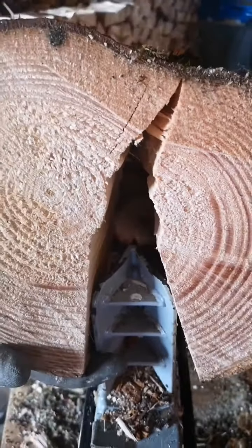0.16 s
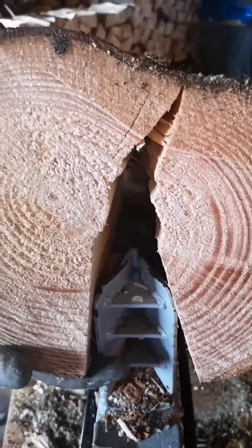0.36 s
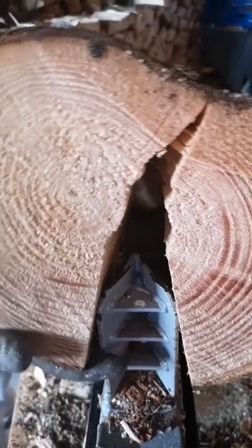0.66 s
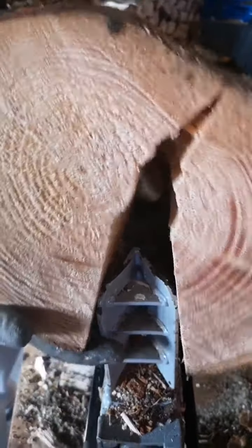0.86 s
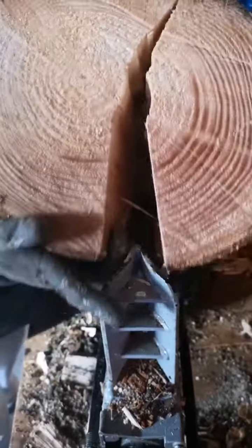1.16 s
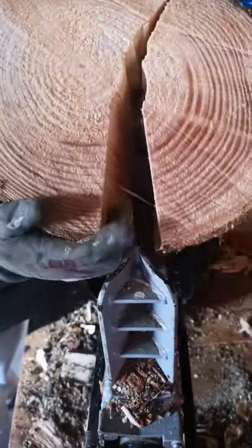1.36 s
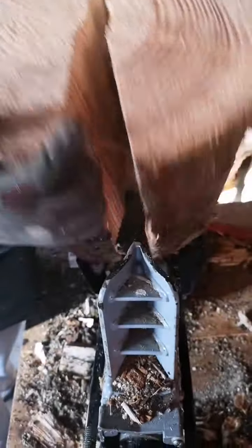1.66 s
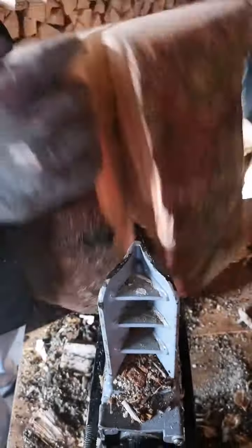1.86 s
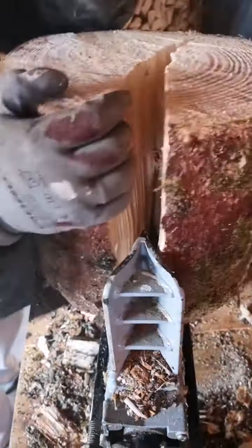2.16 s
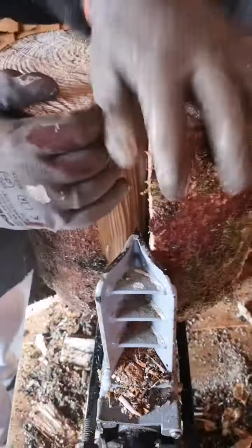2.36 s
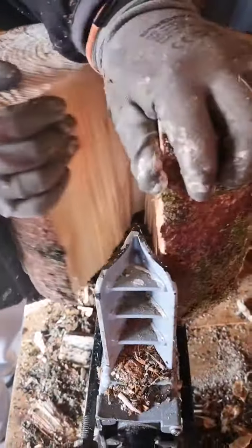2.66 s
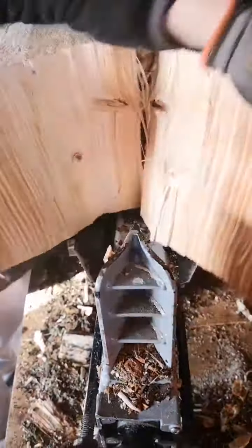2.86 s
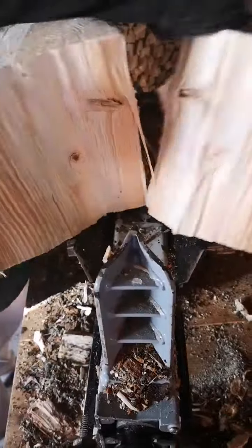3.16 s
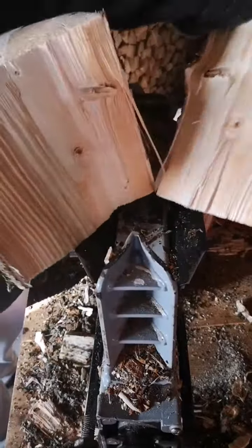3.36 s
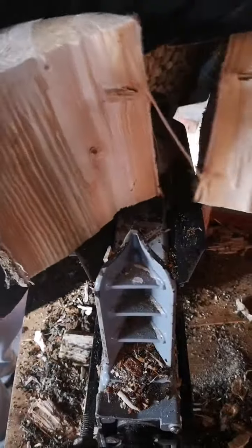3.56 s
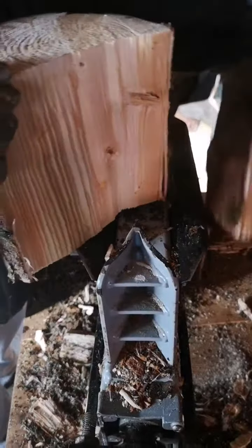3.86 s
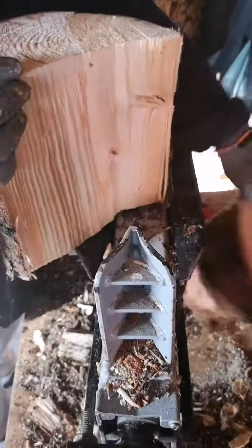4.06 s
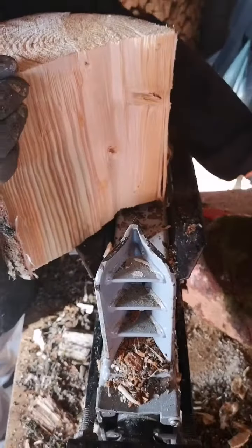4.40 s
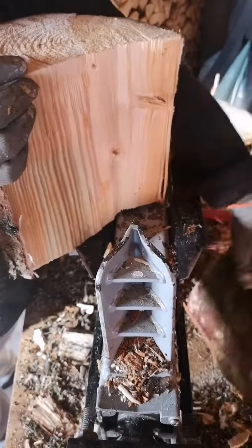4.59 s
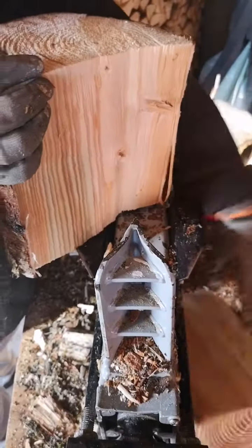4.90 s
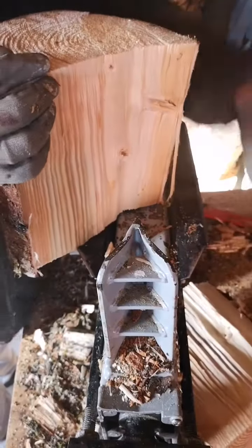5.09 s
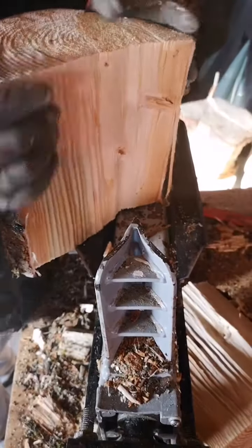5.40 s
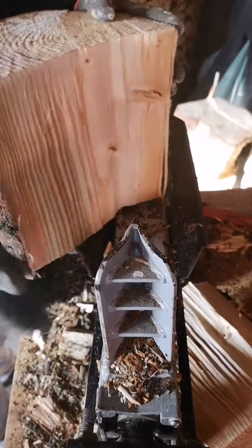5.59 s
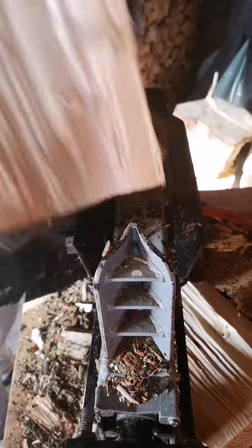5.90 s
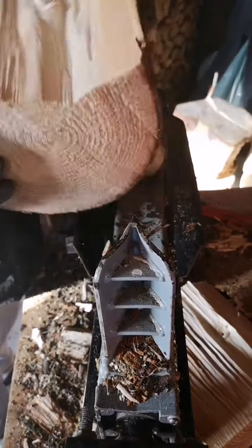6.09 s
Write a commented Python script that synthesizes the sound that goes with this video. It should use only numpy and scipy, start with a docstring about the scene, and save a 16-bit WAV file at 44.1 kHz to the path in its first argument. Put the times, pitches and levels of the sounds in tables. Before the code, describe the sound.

A half-split log bumps softly against a log splitter's steel wedge, with a knock and a small ping. It tips onto the steel bed with heavy thuds and a short metallic hum, then is pulled in two with sharp cracks and snapping fibres. One half drops and tumbles to rest. Gloves and bark rub faintly, all close by in quiet outdoor air.

```python
"""First comes a soft bump, then a knock and a ping: a half-split log hits a log splitter's steel wedge.
Gloved hands work it loose, close by in a wood yard. It tips onto the steel bed, which hums on,
and is pulled in two with sharp cracks and countless small snapping fibres. One half is dropped
and tumbles to rest with heavy thuds. Gloves and bark rub and wood squeaks faintly on steel.
Under it all lie quiet outdoor air and a faint low hum, like the steel bed still ringing."""
import sys
import numpy as np
from scipy import signal
from scipy.fft import rfft, irfft
from scipy.io import wavfile

SR = 44100
rng = np.random.default_rng(int(sys.argv[2]) if len(sys.argv) > 2 else 0)


def unload_wav(signal):
    """Save mono or channel-first audio to the path in sys.argv[1] as 16-bit WAV at rate SR, clipped to [-1, 1]."""
    wavfile.write(
        sys.argv[1],
        SR,
        np.round(np.clip(np.atleast_2d(signal).T, -1, 1) * 32767).astype(np.int16),
    )


N = 275184
TIME = np.arange(N) / SR

# The log landing: start_s, level_db, pitch_hz, overtone_db (added to level_db)
LANDINGS = [(0.088, -46.5, 70, -12.5), (0.47, -45, 111, 14), (0.501, -38.5, 66, 11),
            (1.125, -21.5, 65.3, -17), (1.199, -34.5, 96.3, 4), (1.993, -6.5, 67, -20),
            (2.036, -12.5, 68.4, 3.5), (2.074, -6.5, 76, -8), (2.142, -18.5, 84.6, 2.5),
            (2.337, -30, 66.6, 1), (2.986, -31, 69.3, -6.5), (3.349, -32, 60, -26), (4.105, -13, 66.2, 9.5),
            (4.203, -8, 83.17, -7), (4.678, -10, 67.9, 1), (4.742, -12.5, 76.3, -10.5),
            (4.88, -15, 81, -24.5), (4.92, -24, 76.6, 13), (4.944, -3, 75.2, -6.5), (5.056, -4.5, 73, -2),
            (5.113, -8, 90.2, -18)]

def thuds(low_t60_s=0.17, overtone_t60_s=0.21, overtone_ratio=1.98):
    """The heavy log bounces: a low tone and its overtone. A t60 is the time taken to fade by 60 dB."""
    low = fading_tones([(s, db, hz, low_t60_s) for s, db, hz, _ in LANDINGS])
    high = fading_tones([(s, db + overtone_db, hz * overtone_ratio, overtone_t60_s)
                         for s, db, hz, overtone_db in LANDINGS])
    soft_contact = signal.butter(2, [33, 320], "band", fs=SR, output="sos")
    near = place(signal.sosfilt(soft_contact, low + high), lag_ms=.15, pan_db=-.1)
    return with_echo(near, echo_db=-12)


# Wood hitting steel or wood: start_s, low_db, mid_db, high_db, rattle_db (added to those), pitch_hz
WOOD_HITS = [(0.468, -35.5, -29, -78.5, -22, 630), (1.06, -38.5, -52, -49.5, -2.5, 1420),
             (1.158, -49, -57, -59, -1, 300), (1.198, -44, -54.5, -60, -2.5, 2000),
             (1.301, -58.5, -55.5, -51, 1.5, 330), (1.309, -38.5, -47, -45.5, -7.5, 2100),
             (1.602, -72, -60, -76, -18, 1220), (1.979, -35.5, -47, -52.5, 8, 685),
             (2.02, -28, -30, -28.5, -3, 248), (2.07, -25.5, -39, -35.5, -4, 910),
             (2.116, -39, -34, -32, -7, 826), (2.145, -18.5, -29, -47, -10, 504),
             (2.678, -48, -47, -57.5, -4.5, 258.8), (3.209, -52, -58, -68, -11.5, 285),
             (3.298, -52, -60, -76, -9.5, 282), (3.645, -46.5, -47, -68.5, -13.5, 303),
             (3.74, -62, -85.5, -84, -7, 278.2), (3.937, -54, -46.5, -41.5, -18, 1883),
             (3.995, -49.5, -60.5, -80, -6.5, 267), (4.088, -34, -45, -51, -1, 290),
             (4.108, -25, -35, -38.5, -6, 264), (4.124, -17, -29, -36, -4.5, 1390),
             (4.208, -40.5, -40, -59.5, -8.5, 800), (4.683, -22, -35, -65.5, -10.5, 1500),
             (4.87, -51.5, -64.5, -75, -2, 326), (4.92, -34, -41, -43, -11.5, 269.5),
             (5.062, -27, -42, -49.5, -12, 737), (5.11, -47, -50, -77, -18, 1000),
             (5.423, -96.5, -70.5, -70.5, -4.5, 2220), (5.819, -61, -70, -52, -16, 2102)]
# The tone colour all knocks share: frequency_hz, level_db
KNOCK_SPECTRUM = [(40, -23), (110, -6.5), (260, 0), (480, -11), (850, 1), (1300, -7.5), (1900, 3.5),
                  (3000, -4), (6000, -4), (9400, -7.5), (13000, -28.5)]
# How long rattles and echoes last: frequency_hz, t60_s
FADE_TIMES = [(60, 0.46), (300, 0.38), (1000, 0.37), (3000, 0.42), (8000, .33), (15000, 0.1)]

def knocks(click_db=4, crush_db=2, tail_db=3, hollow_db=7, hollow_octaves=.45, top_hz=10800):
    """Each knock is a click, a brief crushing of bark and a rattle, boosted at the pitch of the wood."""
    start_s, low_db, mid_db, high_db, rattle_db, pitch_hz = np.transpose(WOOD_HITS)
    crush_noise = rng.standard_normal((2, N))
    rattle_noise = [stereo_noise(), stereo_noise()]
    near, rattles = 0, 0
    for k, (hz, band) in enumerate(bands()):
        level_db = np.array([at_hz([(300, low), (1000, mid), (6000, high)], hz)
                             for low, mid, high in zip(low_db, mid_db, high_db)])
        boost_db = hollow_db * np.exp(-(np.log2(hz / pitch_hz) / hollow_octaves) ** 2)
        size = from_db(at_hz(KNOCK_SPECTRUM, hz) + level_db + boost_db)
        click = signal.sosfilt(band, clicks(start_s, size)) * SR / hz * (-1) ** k
        crush_fade = fades(start_s, size, t60_s=0.099, rise_s=0.001)
        crush = rms_one(signal.sosfilt(band, crush_noise[k % 2])) * crush_fade
        near += from_db(click_db) * click + from_db(crush_db) * crush
        rattle_size = size * from_db(rattle_db + tail_db)
        rattle_fade = fades(start_s, rattle_size, at_hz(FADE_TIMES, hz), rise_s=0.0019)
        rattles += rms_one(signal.sosfilt(band, rattle_noise[k % 2])) * rattle_fade
    sound = place(near, lag_ms=.66, pan_db=-3) + pan(rattles, -2)
    return signal.sosfilt(signal.butter(2, top_hz, fs=SR, output="sos"), sound)


# Bare wood meeting something hard: start_s, level_db, pitch_hz, t60_s
HARD_HITS = [(0.468, -13.5, 700, 0.017), (1.058, -35.5, 1520, 0.018), (1.310, -36, 2230, .012),
             (2.1452, -8, 670, 0.0086), (2.1462, -11.5, 1781, 0.009), (4.128, -21.5, 1673, 0.014),
             (4.6845, -15, 882, 0.012), (5.063, -24, 802, .025)]

def clacks():
    """A hard hit makes the wood ring for an instant."""
    near = place(fading_tones(HARD_HITS), lag_ms=.7, pan_db=-7)
    return with_echo(near, echo_db=-9)


# Strands snapping, chips cracking and the sharp tick of a knock: start_s, snap_db, log_ring_db
SHARP_CRACKS = [(1.851, -51, -49.5), (2.3115, -38, -29.5), (2.78, -35, -20), (2.789, -19, -9),
                (2.8123, -12, -1.5), (2.833, -16.5, -13.5), (2.8444, -20, -11), (2.872, -23, -34.5),
                (2.880, -21, -38), (2.917, -25, -22), (2.922, -30, -35), (3.068, -23.5, -36.5),
                (3.104, -29.5, -37), (3.1807, -25, -32), (3.194, -20.5, -31), (3.205, -22.5, -59),
                (3.2584, -34, -53), (3.281, -24, -34), (3.305, -23.5, -39), (3.310, -22.5, -36),
                (3.5271, -32.5, -45), (3.548, -32.5, -31.5), (3.899, -41, -43.5), (3.938, -25, -35),
                (4.1225, -19.5, -18)]
# The bright sound of breaking fibres: frequency_hz, level_db
FIBRE_SPECTRUM = [(400, -29.5), (1000, -10.5), (2000, -4.5), (4000, -7.5), (8500, 3), (10000, -4.5),
                  (12500, -14), (15000, -16)]
# The tones the splitting log rings at: pitch_hz, width_hz, level_db
LOG_TONES = [(340, 150, -15), (1220, 220, -12), (1680, 330, -3), (1990, 360, -1), (3000, 600, -11),
             (4100, 700, -10), (5400, 700, -20)]

def cracks(snap_boost_db=3.5, log_boost_db=16, stereo_db=7):
    """Each sharp crack is a burst of a few milliseconds that rings the log."""
    start_s, snap_db, log_ring_db = np.transpose(SHARP_CRACKS)
    noise = rng.standard_normal(N) + from_db(stereo_db) * stereo_noise()
    burst_fade = fades(start_s, from_db(snap_db + snap_boost_db), t60_s=0.008, rise_s=0.0014)
    burst = colour(noise, FIBRE_SPECTRUM) * burst_fade
    push_fade = fades(start_s, from_db(log_ring_db + log_boost_db), t60_s=0.02, rise_s=0.00018)
    push = rng.choice([-1, 1], N) * push_fade
    log = sum(from_db(db) * resonate(push, hz, width_hz) * (-1) ** k
              for k, (hz, width_hz, db) in enumerate(LOG_TONES))
    near = pan(burst, 4) + place(log, lag_ms=-.15, pan_db=-2)
    return with_echo(near, echo_db=-13)


# Three tugs pulling the halves apart: start_s, strongest_s, end_s, fibre_db, splinter_db
TUGS = [(2.8, 2.87, 2.997, -39.5, -38), (3.12, 3.22, 3.37, -41.5, -46.5), (3.5, 3.54, 3.618, -54.5, -55.5)]
# The duller sound of coarse splinters: frequency_hz, level_db
SPLINTER_SPECTRUM = [(150, 11.5), (500, -10.5), (1200, 4), (1900, 2), (3000, 5), (5000, -13), (10000, -36)]

def tearing(fibre_boost_db=2):
    """Countless fibres break in clumps as the halves part."""
    fine_gain, coarse_gain = stroke_gains(TUGS, swell_db=12.5, fade_s=0.021) * jerks(depth_db=6)
    fibres = colour(grains(per_s=2500, spread_db=4.5), FIBRE_SPECTRUM)
    splinters = colour(grains(per_s=1200, spread_db=4), SPLINTER_SPECTRUM)
    near = from_db(fibre_boost_db) * fine_gain * fibres + coarse_gain * splinters
    return pan(with_echo(near, echo_db=-7), -0.5)


# Blows on the wedge: start_s, level_db, centre_hz (tones near it ring most)
WEDGE_HITS = [(0.474, -36.5, 2500), (1.061, -46.5, 3000), (1.198, -36.5, 4560), (2.024, -25, 8520),
              (2.072, -28.5, 7500), (2.12, -29, 2820), (2.12, -27.5, 6400)]
# The wedge's own tones: pitch_hz, level_db, t60_s
WEDGE_TONES = [(2757, 7, 0.13), (2840, -17.5, .1), (4400, -18.5, .28), (4840, -13, 0.43),
               (6020, -0.5, 0.059), (7640, -0.5, 0.052), (7780, -3.5, 0.081), (9090, 1.5, 0.083)]

def wedge_pings(drop_db_per_octave=20):
    """The steel wedge pings; where it is touched decides which tones answer."""
    start_s, level_db, centre_hz = np.transpose(WEDGE_HITS)
    pings = 0
    for hz, db, t60_s in WEDGE_TONES:
        drop_db = drop_db_per_octave * abs(np.log2(hz / centre_hz))
        pings += ring(clicks(start_s, from_db(level_db + db - drop_db)), hz, t60_s)
    return place(pings, lag_ms=0.0055, pan_db=0.9)


# Blows that reach the steel bed: start_s, level_db, brightness_db_per_octave
BED_HITS = [(0.472, -38.5, -2.2), (1.059, -36.5, -1), (2.119, -15, -3.5), (4.124, -27, 3.5)]
# The bed's own tones: pitch_hz, level_db, t60_s
BED_TONES = [(185, -14.5, 1.33), (300, -16, 0.62), (426, -30, 1.0), (658, -26.5, 0.7), (803, -17, .28),
             (932, -19, .18), (1210, -38, 2.1), (1560, -30.5, 0.37), (1760, -25, 0.96), (2190, -32, .55),
             (3405, -19.5, .55), (4770, -22, 0.37)]

def bed_hum(pivot_hz=494, twin_gap_hz=8, twin_db=-9):
    """The steel bed hums on after a blow; each tone wavers against a slightly higher twin."""
    start_s, level_db, brightness = np.transpose(BED_HITS)
    hum = 0
    for hz, db, t60_s in BED_TONES:
        push = clicks(start_s, from_db(level_db + db + brightness * np.log2(hz / pivot_hz)))
        twin_hz = hz + twin_gap_hz * rng.uniform(.5, 1.8)
        hum += ring(push, hz, t60_s) + from_db(twin_db) * ring(push, twin_hz, t60_s)
    return place(hum, lag_ms=0.17, pan_db=-0.5)


# Gloves, sleeves and bark sliding: start_s, strongest_s, end_s, hiss_db, rasp_db
SLIDES = [(0.315, 0.36, 0.44, -55.5, -58.5), (0.42, 0.48, 0.54, -60, -54.5),
          (0.995, 1.017, 1.03, -54.5, -70), (1.07, 1.17, 1.256, -53.5, -52.5),
          (1.36, 1.39, 1.55, -63.5, -64), (1.89, 1.975, 2.014, -51.5, -48.5),
          (2.46, 2.497, 2.508, -47.5, -53.5), (2.56, 2.63, 2.76, -58, -62), (3.435, 3.452, 3.475, -55, -68),
          (3.875, 3.903, 3.93, -51.5, -54), (4.59, 4.67, 4.75, -52.5, -54.5),
          (4.845, 4.905, 4.92, -53.5, -57), (4.99, 5.04, 4.975, -20, -53.5), (5.46, 5.535, 5.53, -57, -58),
          (6.04, 6.09, 6.17, -61, -62), (6.21, 6.24, 6.5, -58, -56.5)]
# The thin hiss of sliding: frequency_hz, level_db
HISS_SPECTRUM = [(500, -27), (2500, -19.5), (5000, 9), (9200, 11), (10800, -3.5), (12500, -8),
                 (15000, -6.5)]

def rubbing(hiss_trim_db=-1):
    """Surfaces slide past each other: a slightly jerky hiss with fine grit in it."""
    hiss_gain, rasp_gain = stroke_gains(SLIDES, swell_db=10.5, fade_s=0.013) * jerks(depth_db=1.5)
    friction = stereo_noise() + rms_one(grains(per_s=2000, spread_db=3.5))
    hiss = from_db(hiss_trim_db) * hiss_gain * colour(friction, HISS_SPECTRUM)
    rasp = rasp_gain * colour(friction, SPLINTER_SPECTRUM)
    return pan(with_echo(hiss + rasp, echo_db=-9), -1.5)


# The log creeping on the wedge: start_s, end_s, pitch_hz, level_db
CREEPS = [(0.785, 1.106, 1556, -69), (1.42, 1.54, 2145, -68), (1.478, 1.643, 2850, -67)]

def squeaks(width_hz=110):
    """Wood sticks and slips on the steel: a faint, rough, narrow tone."""
    sound = 0
    for start_s, end_s, hz, db in CREEPS:
        swell = np.sin(np.pi * np.clip((TIME - start_s) / (end_s - start_s), 0, 1))
        rough_tone = resonate(rng.standard_normal(N), hz, width_hz)
        sound += from_db(db) * swell * rms_one(resonate(rough_tone, hz, width_hz))
    return place(sound, lag_ms=0.083, pan_db=-4)


# How loud the faint low hum is: time_s, level_db
LOW_HUM_LEVELS = [(0, -55.5), (0.4, -57), (1.0, -55.5), (1.6, -70), (3.0, -53.5), (6.24, -75.5)]
# The low hum's tone colour: frequency_hz, level_db
LOW_HUM_SPECTRUM = [(50, 10.5), (110, -4.5), (135, 11), (165, -7), (300, -8), (400, -1), (520, -16),
                    (900, -10.5), (1300, -19.5), (2800, -18), (4500, -38.5)]
# The hush of outdoor air: frequency_hz, level_db
AIR_SPECTRUM = [(20, 7.5), (65, -1), (110, -12), (250, -16.5), (500, -30.5), (900, -27), (1600, -22.5),
                (2500, -23.5), (5000, -29.5), (9400, -28), (12000, -43), (16000, -44)]

def background(air_db=-61):
    """Steady outdoor air, and a faint low hum that comes and goes, like the steel bed still ringing."""
    hum_gain = from_db(np.interp(TIME, *np.transpose(LOW_HUM_LEVELS)))
    low_hum = hum_gain * colour(stereo_noise(), LOW_HUM_SPECTRUM)
    return low_hum + from_db(air_db) * colour(stereo_noise(), AIR_SPECTRUM)


# How alike scattered sound is on the left and right: frequency_hz, likeness (0 to 1)
STEREO_LIKENESS = [(60, 1), (150, .95), (300, 0.13), (600, .1), (2000, .05), (12000, .05)]

def stereo_noise():
    """White noise whose two sides are alike in the bass and almost unrelated in the treble."""
    alike = np.clip(at_hz(STEREO_LIKENESS, np.fft.rfftfreq(N, 1 / SR)), 0, 1)
    mid, side = rfft(rng.standard_normal((2, N)))
    return irfft(np.sqrt(1 + alike) * mid + np.sqrt(1 - alike) * side * [[1], [-1]], N) / np.sqrt(2)


def with_echo(x, echo_db, build_s=0.0011):
    """Add the dense, short echoes from the machine and the woodpiles."""
    t = TIME[:SR // 2]
    noise = stereo_noise()[:, :len(t)]
    echo = sum(signal.sosfilt(band, noise) * from_db(-60 * t / at_hz(FADE_TIMES, hz))
               for hz, band in bands())
    echo = rms_one(echo * (1 - np.exp(-t / build_s))) / np.sqrt(len(t))
    return x + from_db(echo_db) * signal.fftconvolve(x, echo, axes=1)[:, :N]


def stroke_gains(strokes, swell_db, fade_s):
    """Each stroke grips, swells, eases and lets go; gives one gain curve for each of its two levels."""
    curves = np.zeros((2, N))
    for start, strongest, end, *levels_db in strokes:
        gate = np.interp(TIME, [start - fade_s, start, end, end + fade_s], [0, 1, 1, 0]) ** 2
        effort = np.interp(TIME, [start, strongest, end], [0, 1, 0])
        curves += np.outer(from_db(levels_db), gate * from_db(swell_db * (effort - 1)))
    return curves


def jerks(depth_db, per_s=110):
    """Wood lets go in fits: a gain that wanders quickly."""
    steps = np.clip(rng.standard_normal(2000), -2, 2)
    return rms_one(from_db(depth_db * np.interp(TIME * per_s, np.arange(len(steps)), steps)))


def grains(per_s, spread_db):
    """Random tiny clicks of very uneven size, each with its own strength left and right."""
    ticks = (rng.random(N) < per_s / SR) * rng.choice([-1, 1], N)
    size_db = spread_db * np.minimum(rng.exponential(1, N), 4)
    return ticks * from_db(size_db + rng.normal(0, 3, (2, N)))


def clicks(times, sizes):
    """One single-sample click at each time."""
    return np.bincount(np.round(times * SR).astype(int), sizes, N)[:N] + 1e-18


def fades(times, sizes, t60_s, rise_s):
    """A gain that jumps up at each time and dies away; overlapping blows add in power."""
    power = signal.lfilter([1], [1, -from_db(-120 / (t60_s * SR))], clicks(times, sizes ** 2))
    smooth = np.exp(-1 / (rise_s * SR))
    return signal.lfilter([1 - smooth], [1, -smooth], np.sqrt(power))


def fading_tones(blows):
    """Each blow starts a fading tone at its own pitch."""
    return sum(ring(clicks(np.array([s]), from_db([db])), hz, t60_s) for s, db, hz, t60_s in blows)


def ring(x, hz, t60_s):
    """Each click in x starts a fading sine wave as tall as the click."""
    decay, angle = from_db(-60 / (t60_s * SR)), 2 * np.pi * hz / SR
    return signal.lfilter([0, np.sin(angle)], [1, -2 * decay * np.cos(angle), decay ** 2], x)


def resonate(x, hz, width_hz):
    """Let through the sound near one pitch."""
    decay, angle = np.exp(-np.pi * width_hz / SR), 2 * np.pi * hz / SR
    gain = (1 - decay ** 2) / 2
    return signal.lfilter([gain, 0, -gain], [1, -2 * decay * np.cos(angle), decay ** 2], x)


def colour(x, spectrum):
    """Give a steady sound a tone colour, at an average (rms) level of 1."""
    return rms_one(irfft(rfft(x) * from_db(at_hz(spectrum, np.fft.rfftfreq(N, 1 / SR))), N))


def bands():
    """Filters half an octave wide, as (centre_hz, filter) pairs."""
    edges_hz = 31 * 2 ** (np.arange(19) / 2)
    return [(np.sqrt(low * high), signal.butter(2, [low, high], "band", fs=SR, output="sos"))
            for low, high in zip(edges_hz, edges_hz[1:])]


def place(x, lag_ms, pan_db):
    """Set a sound to one side; a positive lag makes the left channel late."""
    left = np.interp(TIME - lag_ms / 1000, TIME, x)
    return pan(np.array([left, x]), pan_db)


def pan(x, pan_db):
    """Tip the balance: positive is louder on the left, negative on the right."""
    return x * from_db([[pan_db / 2], [-pan_db / 2]])


def at_hz(points, hz):
    """Read between a table's rows, with octaves evenly spaced."""
    row_hz, values = np.transpose(points)
    return np.interp(np.log(hz + 1e-3), np.log(row_hz), values)


def from_db(db):
    """Decibels to gain."""
    return 10 ** (np.asarray(db) / 20)


def rms_one(x):
    """Scale to an average (rms) level of 1."""
    return x / np.sqrt(np.mean(x ** 2) + 1e-20)


def scene():
    """All the sounds together, in stereo."""
    blows = thuds() + knocks() + clacks() + wedge_pings() + bed_hum()
    return blows + cracks() + tearing() + rubbing() + squeaks() + background()


def record(dry):
    """The loudest peaks clip, and treble above 15.7 kHz is cut."""
    treble_cut = signal.ellip(10, .2, 80, 15700, fs=SR, output="sos")
    return signal.sosfilt(treble_cut, np.clip(dry, -1, 1))


dry = scene()
out = record(dry)
unload_wav(out)
```